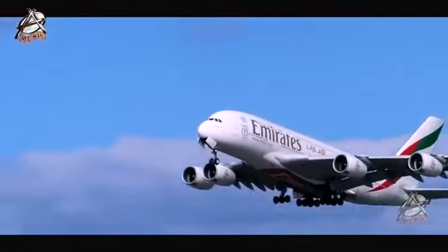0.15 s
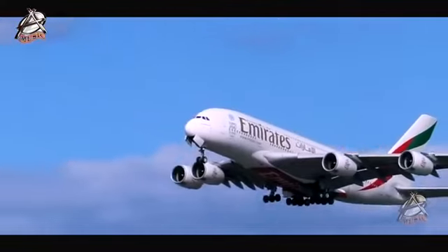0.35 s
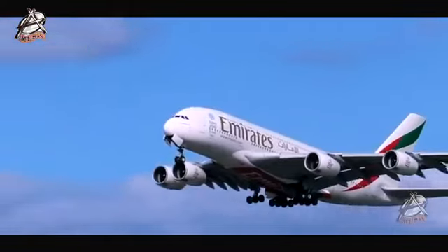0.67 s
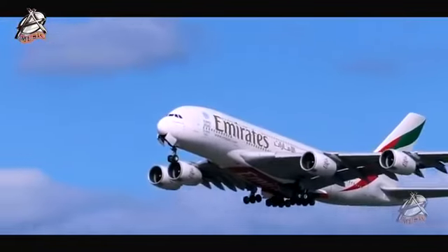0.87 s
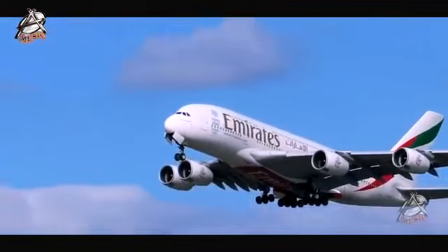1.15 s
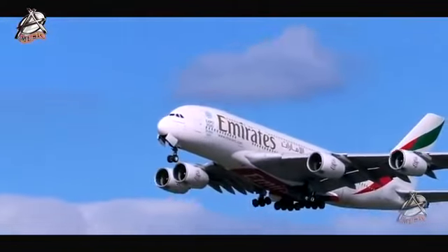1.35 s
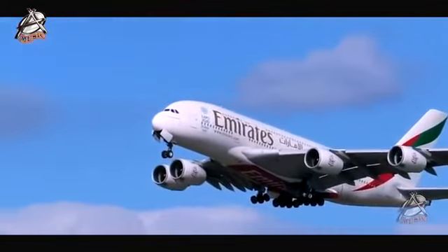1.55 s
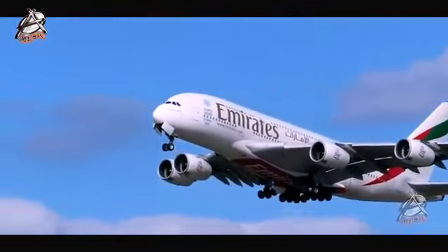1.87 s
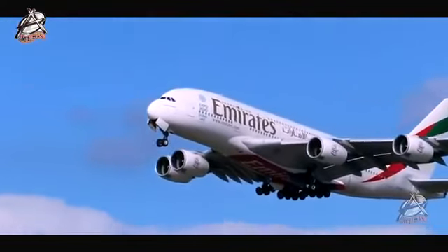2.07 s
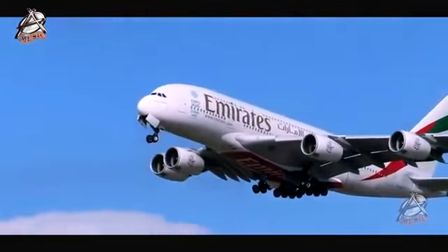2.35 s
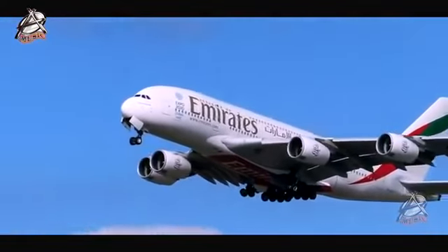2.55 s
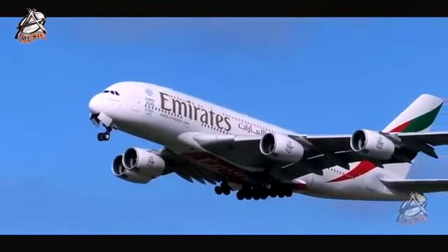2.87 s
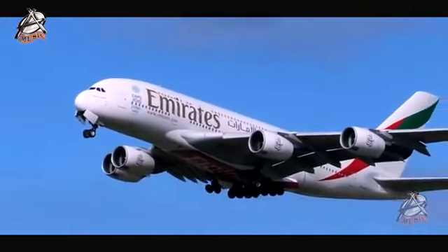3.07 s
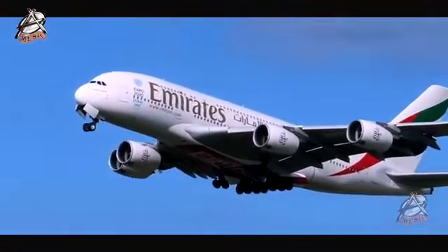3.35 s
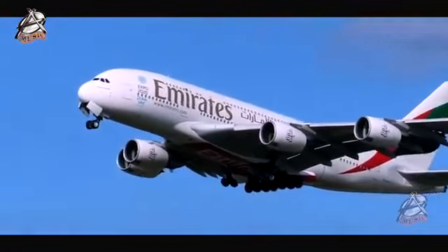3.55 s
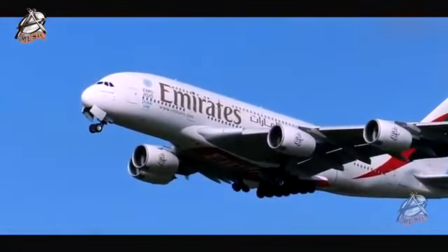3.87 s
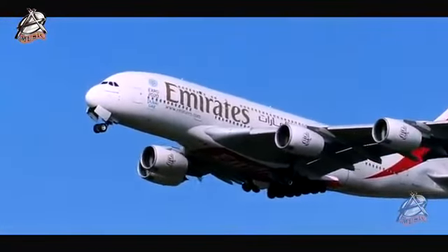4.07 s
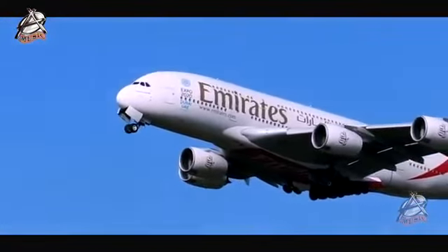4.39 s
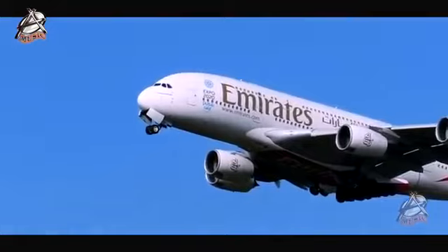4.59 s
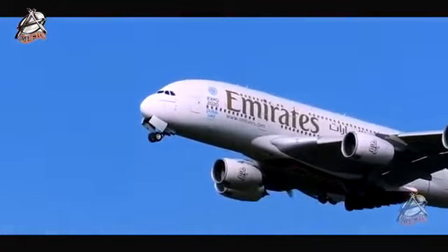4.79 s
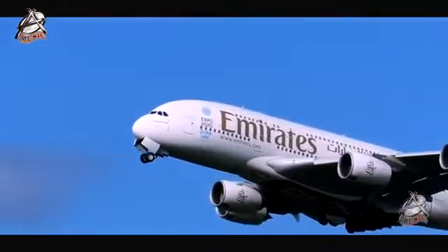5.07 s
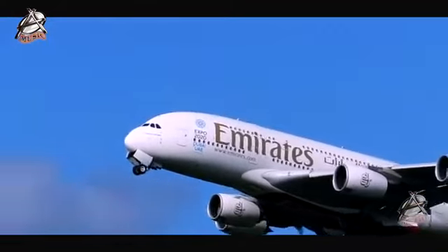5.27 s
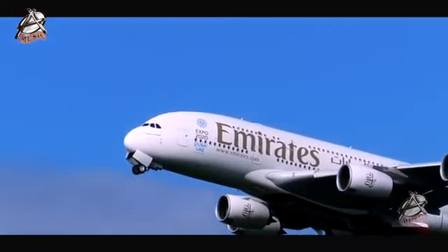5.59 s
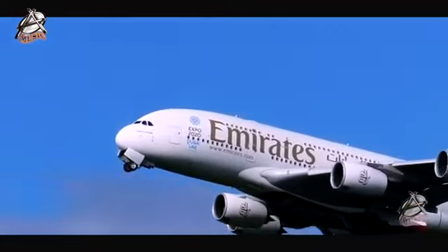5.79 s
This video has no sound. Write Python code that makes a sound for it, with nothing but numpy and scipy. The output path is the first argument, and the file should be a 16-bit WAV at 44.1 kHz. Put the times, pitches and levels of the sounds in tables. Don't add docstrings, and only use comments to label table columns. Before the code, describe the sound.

A big four-engine jet climbs past low overhead, its wavering fan whine riding a growing roar and deep, surging exhaust rumble.

```python
import sys
import numpy as np
from scipy import signal
from scipy.fft import rfft, irfft, next_fast_len
from scipy.io import wavfile
from scipy.ndimage import uniform_filter1d

SR = 44100
rng = np.random.default_rng(int(sys.argv[2]) if len(sys.argv) > 2 else 0)


def amplitude_ratio(level_db):
    exponent = np.asarray(level_db, float) / 20
    return 10 ** exponent


def output_pcm(signal):
    pcm = np.clip(np.atleast_2d(signal).T, -1, 1) * 32767
    wavfile.write(sys.argv[1], SR, np.round(pcm).astype(np.int16))


N = 261370
TIME = np.arange(N) / SR
SIZE = next_fast_len(N)
HZ = np.maximum(np.fft.rfftfreq(SIZE, 1 / SR), 1)


def rms_one(x):
    return x / np.sqrt(np.mean(x ** 2) + 1e-20)


def in_time(rows):
    s, *columns = np.transpose(rows)
    return [np.interp(TIME, s, column) for column in columns]


def at_hz(points, hz=HZ):
    point_hz, value = np.array(points).T
    return np.interp(np.log(hz), np.log(point_hz), value)


def drift(rate_hz):
    step = 40
    r = np.exp(-2 * np.pi * rate_hz * step / SR)
    slow = signal.lfilter([1], [1, -2 * r, r * r], rng.standard_normal(N // step + 2002))[2000:]
    return np.interp(np.arange(N) / step, np.arange(len(slow)), rms_one(slow))


def bumps(rows):
    coarse = TIME[::40]
    s, db, half_width_s = np.transpose(rows)[:, :, None]
    bells = db * np.exp(-.5 * ((coarse - s) / half_width_s) ** 2)
    return np.interp(TIME, coarse, np.sum(bells, axis=0))


def noise_bins(colour):
    inside = (HZ > colour[0][0]) & (HZ < colour[-1][0])
    return rfft(rng.standard_normal(SIZE)) * amplitude_ratio(at_hz(colour)) * inside


def share_out(mid, side, alike):
    return mid * np.sqrt((1 + alike) / 2) + side * np.sqrt((1 - alike) / 2) * [[1], [-1]]


# pitch_hz, density_db (per Hz)
HISS_COLOUR = [(4500, 2.5), (6500, 8), (8000, 4.5), (10000, 0.5), (12000, -8), (15000, -28)]


def hiss():
    level_db, follows_jet, follow_s = -41, 0.48, .4
    mid, side = [rms_one(irfft(noise_bins(HISS_COLOUR), SIZE)[:N]) for _ in range(2)]
    side = irfft(rfft(side, SIZE) * (HZ > 6900), SIZE)[:N]
    jet_db = uniform_filter1d(in_time(ENGINES)[0], int(follow_s * SR), mode="nearest")
    whine = amplitude_ratio(-72) * np.sin(2 * np.pi * 10300 * TIME)
    return share_out(mid, side, 0.56) * amplitude_ratio(level_db + follows_jet * jet_db) + whine


# start_s, peak_db
CRACKLE = [(2.7071, -37), (3.018, -31), (3.1281, -35), (3.208, -38), (3.2205, -38), (3.3002, -43),
           (3.3871, -31), (3.4299, -41), (3.4669, -39), (3.4973, -35), (3.6534, -33), (3.735, -38),
           (3.9109, -40), (4.1482, -34.5), (4.525, -35), (4.6467, -36), (4.7569, -30), (4.7963, -35),
           (4.8273, -34), (4.9555, -36), (4.9984, -37), (5.025, -36), (5.2049, -34), (5.2356, -33),
           (5.3314, -34), (5.62, -40), (5.6684, -35), (5.7372, -37), (5.7554, -26), (5.7771, -35)]
# pitch_hz, density_db (per Hz)
CRACKLE_COLOUR = [(3000, -3), (5000, 9), (8000, -6.5), (11000, -14), (15000, -17)]


def crackle():
    half_wave_s, after_loss_db, after_spread_db = .0085, 4.0, 2.5
    first_s, first_db = np.transpose(CRACKLE)[:, :, None]
    chance, later = rng.standard_normal((len(CRACKLE), 3, 4)), np.arange(4)
    s = first_s + later * half_wave_s * (1 + .12 * chance[:, 0])
    peak_db = first_db - later * after_loss_db + after_spread_db * chance[:, 1] * (later > 0) + 7
    left_db = -7.5 + chance[:, 2]
    starts = np.zeros((2, N))
    starts[:, (s.ravel() * SR).astype(int)] = amplitude_ratio(peak_db.ravel() + left_db.ravel() * [[.5], [-.5]])
    burst = np.hanning(int(2 * 0.0017 * SR))
    grit = np.array([rms_one(irfft(noise_bins(CRACKLE_COLOUR), SIZE)[:N]) for _ in range(2)])
    return signal.lfilter(burst, [1], starts) * (grit + 0.35 * grit[::-1])


# pitch_hz, left_minus_right_db
LEFT_DB = [(600, 0), (700, -1.5), (1000, -3.5), (2000, -3), (2600, -1), (3500, -3), (5050, -3.5),
           (5250, 0.5)]


def to_channels(bins):
    lead_s, lead_below_hz = .0001, 780
    lead = np.exp(1j * np.pi * HZ * lead_s * (HZ < lead_below_hz))
    half = amplitude_ratio(at_hz(LEFT_DB) / 2) * lead
    return np.array([bins * half, bins / half])


def tone(hz, level_db, wander_rad, flutter_db):
    phase = 2 * np.pi * np.cumsum(hz) / SR + wander_rad * drift(9.8)
    return np.sqrt(2) * amplitude_ratio(level_db + flutter_db * drift(14.0)) * np.sin(phase)


# start_s, pitch_hz, level_db, second_multiple_db
PITCH = [(0, 1079, -36.5, -45), (1, 1085, -31, -41), (2, 1085, -24.5, -35.5), (3.3, 1078, -19.5, -27),
         (4.1, 1073, -22, -28), (5, 1073, -22.5, -33.5), (5.93, 1057, -30, -36)]
# start_s, change_db, half_width_s
SWELLS = [(0.02, -10, 0.015), (0.15, 5, 0.034), (0.31, -9, 0.031), (0.51, -5.5, 0.065), (0.77, 5, 0.04),
          (1.02, 3, 0.017), (1.44, -3.5, 0.022), (1.76, 6.0, 0.013), (1.94, -0.5, 0.028),
          (2.06, 4.5, 0.011), (2.24, -4, 0.025), (2.3, 3.5, 0.14), (2.47, 2.5, 0.025), (2.59, -4, 0.017),
          (2.8, -5, 0.048), (3.1, 3, 0.073), (3.28, -13.5, 0.018), (3.46, 5, 0.053), (3.67, 4, 0.015),
          (3.85, -6.0, 0.019), (4.06, -9, 0.038), (4.15, 5.5, 0.018), (4.33, -3.5, 0.029),
          (4.6, -5.5, 0.016), (4.66, 2.5, 0.0094), (4.81, 6.5, 0.027), (4.93, -12, 0.041),
          (5.33, -14, 0.012), (5.49, 1.5, 0.025), (5.67, 7, 0.046)]
# start_s, pitch_hz, level_db
WHISTLE = [(0, 4605, -51), (1, 4610, -48), (2.5, 4610, -45), (3.5, 4590, -52), (5.93, 4520, -56)]
# start_s, pitch_hz, level_db
BUZZ = [(0, 730, -52), (1.2, 727, -46.5), (1.6, 724.7, -30), (2, 735.7, -40), (5.93, 709.6, -36)]


def fans():
    mean_hz, first_db, second_db = in_time(PITCH)
    hz = mean_hz + 1.77 * drift(3.5)
    swell_db = bumps(SWELLS)
    first = tone(hz, first_db + 1.47 * swell_db, 0.56, 2.1)
    second = tone(2 * hz, second_db + 0.64 * swell_db, 1.4, 2.35)
    whistle = tone(*in_time(WHISTLE), 4.0, 2.2)
    buzz = tone(*in_time(BUZZ), 0.79, 0.92)
    return irfft(to_channels(rfft(first + second + whistle + buzz, SIZE)), SIZE)[:, :N]


# start_s, jet_mixing_db, fan_and_core_db
ENGINES = [(0.0, -35, -33.5), (1.3, -26, -29.5), (1.72, -23, -24.5), (2.57, -20.5, -25), (2.71, -25, -20.5),
           (2.72, -21.5, -21), (3.17, -24, -17), (3.52, -22.5, -16.5), (3.55, -25, -20.5), (3.93, -22, -26),
           (4.08, -21.5, -25.5), (4.44, -23, -21.5), (4.87, -20, -20), (4.9, -20.5, -22),
           (5.89, -20.5, -19.5), (5.93, -22.5, -18.5)]


def roar_levels():
    jet, fan = in_time(ENGINES)
    late_fan = np.interp(TIME - 0.18, TIME, fan)
    wake = jet + 0.48 * (late_fan - jet)
    top = -34 + 0.77 * fan + 2.5 * TIME
    return np.array([jet, wake, fan, top])


ROAR_AT_HZ = (400, 1500, 3300, 5600)
# pitch_hz, density_db (per Hz)
ROAR_COLOUR = [(82, -23), (140, -16.5), (169, -15.5), (487, -3.5), (657, -10.5), (733, -8.5), (959, -11),
               (1090, -3.5), (1140, -9.5), (1250, -10.5), (2110, -9), (2280, -10.5), (3330, -12.5),
               (4720, -21), (6070, -33.5), (7890, -53.5), (13400, -120)]
# pitch_hz, likeness (0 to 1)
LIKENESS = [(120, 0.81), (170, 0.79), (260, 0.92), (400, 1), (650, 1), (720, 1), (4000, 0.99), (7000, 1)]


def roar():
    patchy_db, level_db = 1.43, 2.0
    echo_s, echo_share = 0.003003, 0.13
    shared, unlike = noise_bins(ROAR_COLOUR), noise_bins(ROAR_COLOUR)
    pair = share_out(to_channels(shared), unlike, np.clip(at_hz(LIKENESS), 0, 1))
    pair = pair * (1 - echo_share * np.exp(-2j * np.pi * HZ * echo_s) / (1 + (HZ / 2500) ** 2))

    levels = uniform_filter1d(roar_levels(), int(.06 * SR))
    usual = 10 * np.log10(np.mean(amplitude_ratio(2 * levels), axis=1))
    change = levels - usual[:, None]

    place = 3 * np.log2(HZ / 125)
    gust = drift(3.0)
    out, plain = 0, 0
    for k in range(19):
        slice_k = irfft(pair * np.clip(1 - np.abs(place - k), 0, 1), SIZE)[:, :N]
        among = np.interp(np.log(125 * 2 ** (k / 3)), np.log(ROAR_AT_HZ), np.arange(4))
        weights = np.clip(1 - np.abs(among - np.arange(4)), 0, 1)
        fade_db = patchy_db * (0.18 * gust + drift(4.3))
        out = out + slice_k * amplitude_ratio(weights @ change + fade_db)
        plain = plain + slice_k
    total_db = 10 * np.log10(np.sum(amplitude_ratio(2 * usual)))
    return out / np.std(plain) * amplitude_ratio(total_db + level_db)


def nearness_db():
    far_loss_db, closing_s = 13.5, 1.77
    return -far_loss_db * np.exp(-TIME / closing_s)


# pitch_hz, density_db (per Hz)
RUMBLE_COLOUR = [(18, -25), (27, -26), (38, -1), (50, 0), (60, 3), (95, -1.5), (125, -12), (150, -20.5),
                 (175, -44)]
# start_s, change_db, half_width_s
SURGES = [(0.1, 4, 0.015), (0.18, -10, 0.02), (0.35, 3.0, 0.13), (0.54, -0.5, 0.025), (0.67, 9, 0.029),
          (0.92, 4.5, 0.034), (0.99, -2, 0.013), (1.27, 7, 0.02), (1.53, 4, 0.17), (1.73, 2.5, 0.015),
          (1.81, -10, 0.025), (1.91, 3.5, 0.14), (2.35, -4.5, 0.045), (2.65, -6, 0.015), (2.73, 5, 0.025),
          (2.81, -10, 0.02), (2.95, -6, 0.024), (3.04, 5, 0.025), (3.35, -5.0, 0.018), (3.43, 3.0, 0.021),
          (3.85, -4.5, 0.018), (3.94, -13, 0.012), (4.0, 5.5, 0.015), (4.18, 4, 0.17), (4.47, -4.5, 0.017),
          (4.61, -3.5, 0.028), (4.8, -3, 0.015), (5.19, 4.5, 0.04), (5.34, 6.5, 0.025), (5.77, 4.5, 0.022)]


def rumble():
    level_db, surge_depth = -10.5, 0.97
    evenness, smooth_s = 0.24, 0.016
    low = rms_one(irfft(noise_bins(RUMBLE_COLOUR), SIZE))
    swell = uniform_filter1d(np.abs(signal.hilbert(low)), int(smooth_s * SR))
    even = rms_one((low / (swell + 0.14) ** evenness)[:N])
    eddies = even * amplitude_ratio(level_db + nearness_db() + surge_depth * bumps(SURGES))
    return signal.sosfilt(signal.butter(3, [31, 135], "band", fs=SR, output="sos"), eddies)


def scene():
    return hiss() + fans() + roar() + rumble()


def low_pass(x):
    return signal.sosfilt(signal.butter(12, 20000, fs=SR, output="sos"), x)


def record(dry):
    ceiling, knee, cut_hz, edge_s = 1.05, 13.0, 14900, .002
    flat = dry / (1 + np.abs(dry / ceiling) ** knee) ** (1 / knee) + crackle()
    edges = np.minimum(1, np.minimum(TIME, TIME[::-1]) / edge_s)
    dull = signal.sosfilt(signal.cheby2(10, 30, cut_hz, fs=SR, output="sos"), flat) * edges
    return low_pass(dull)


dry = scene()
out = record(dry)
output_pcm(out)
```